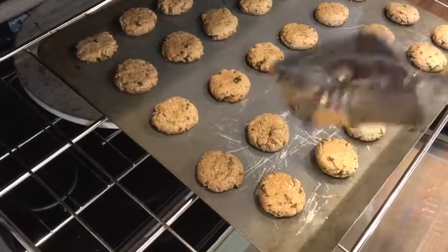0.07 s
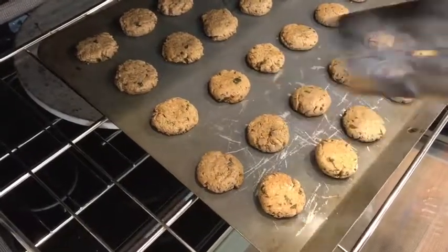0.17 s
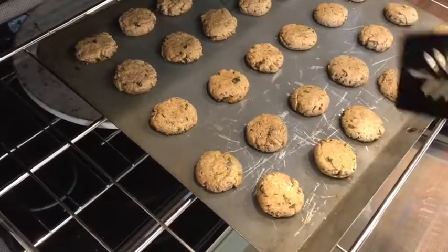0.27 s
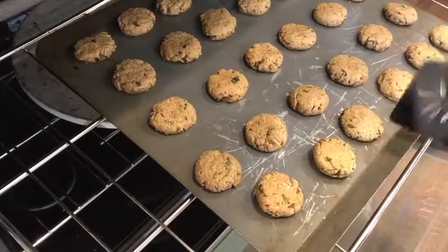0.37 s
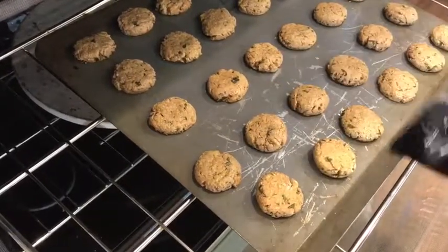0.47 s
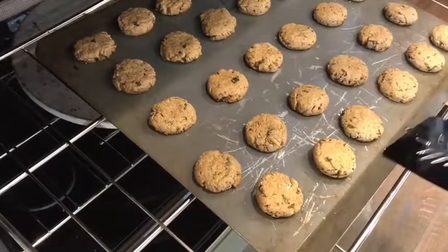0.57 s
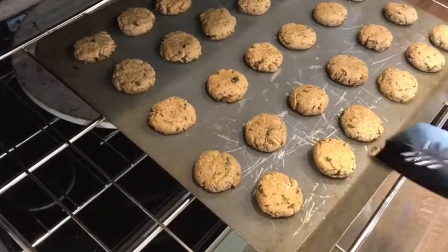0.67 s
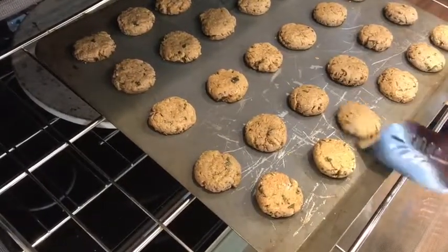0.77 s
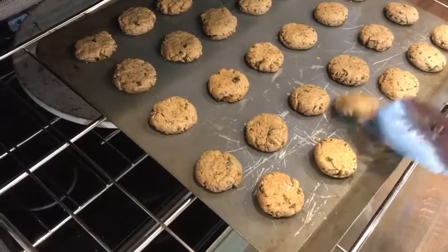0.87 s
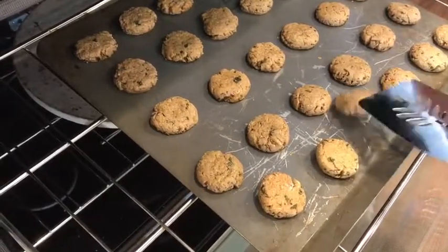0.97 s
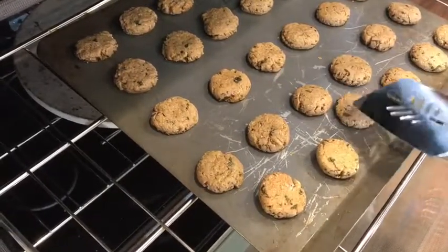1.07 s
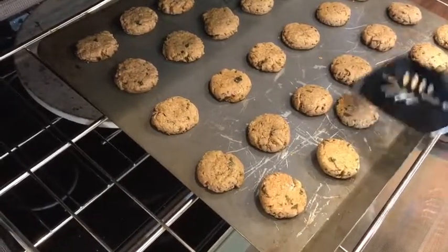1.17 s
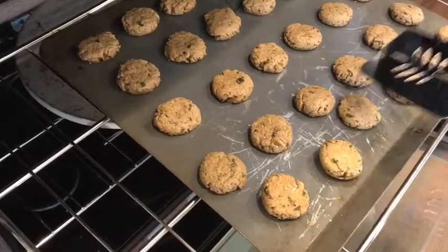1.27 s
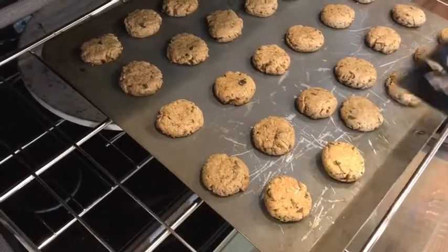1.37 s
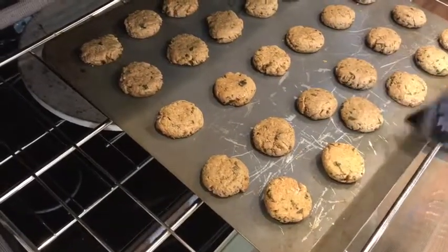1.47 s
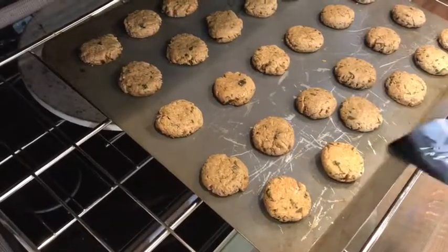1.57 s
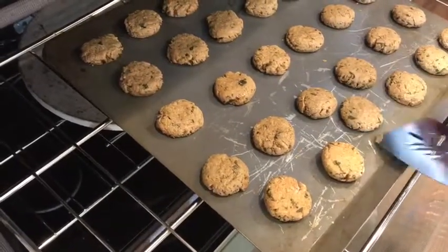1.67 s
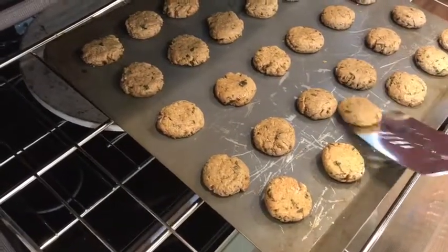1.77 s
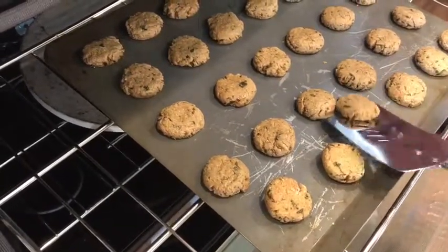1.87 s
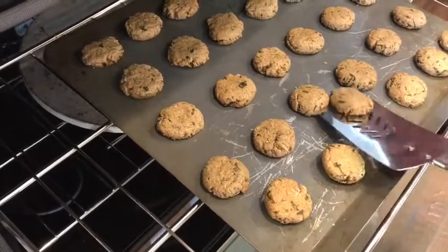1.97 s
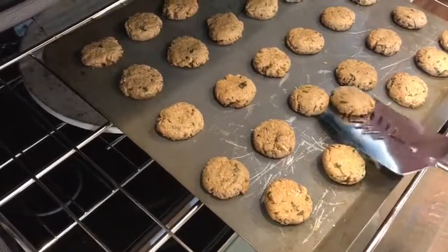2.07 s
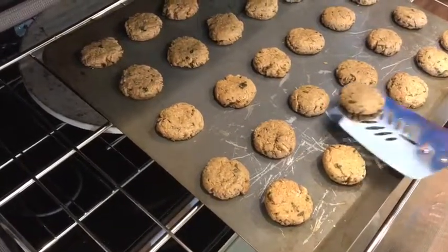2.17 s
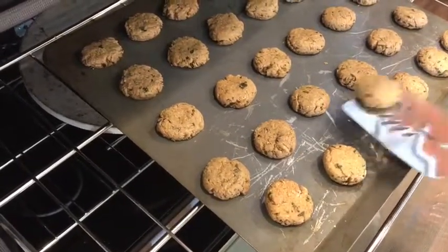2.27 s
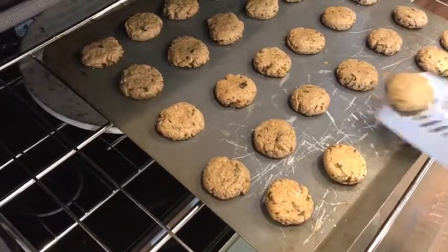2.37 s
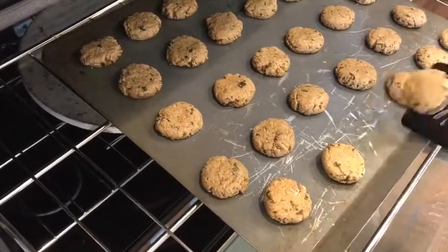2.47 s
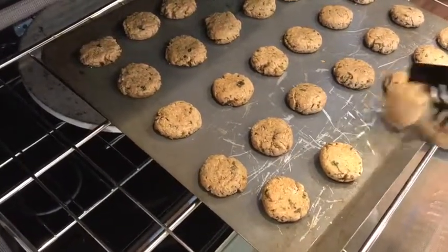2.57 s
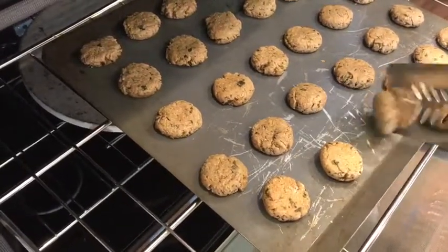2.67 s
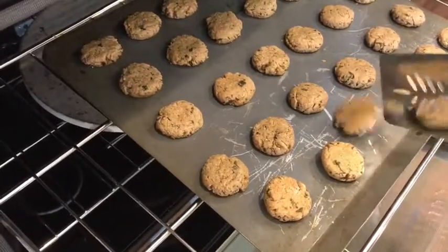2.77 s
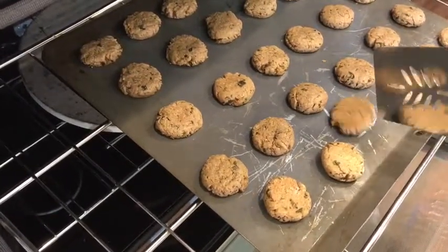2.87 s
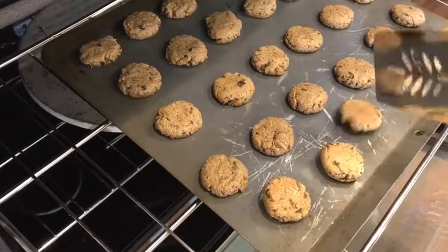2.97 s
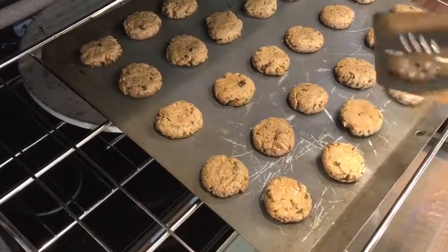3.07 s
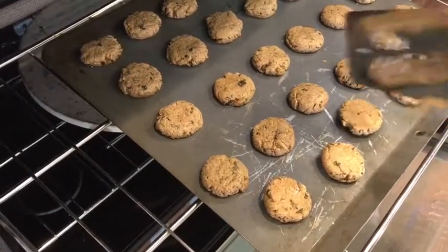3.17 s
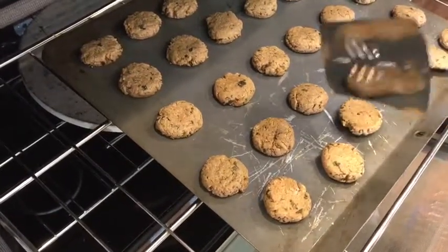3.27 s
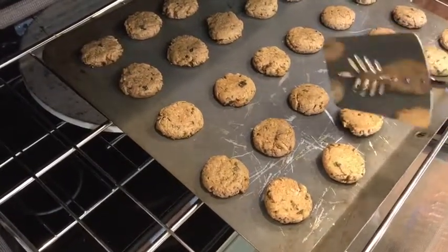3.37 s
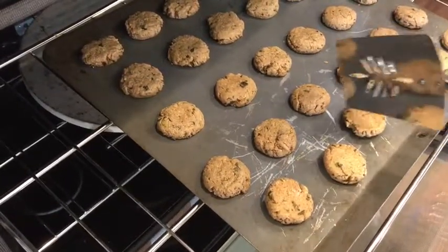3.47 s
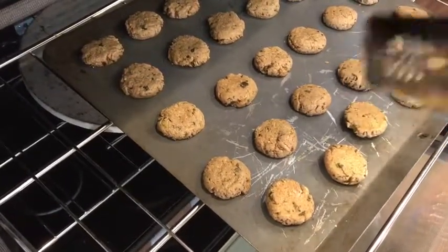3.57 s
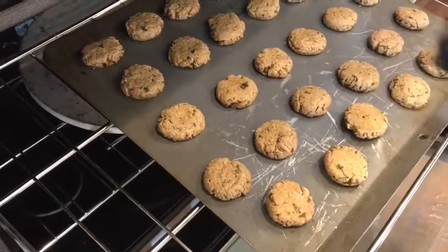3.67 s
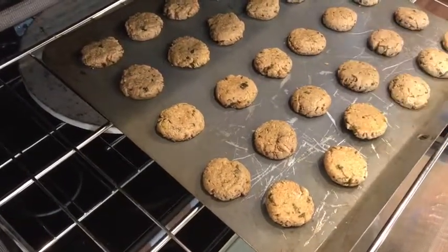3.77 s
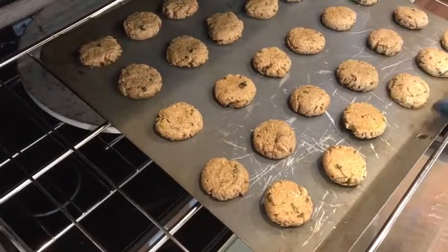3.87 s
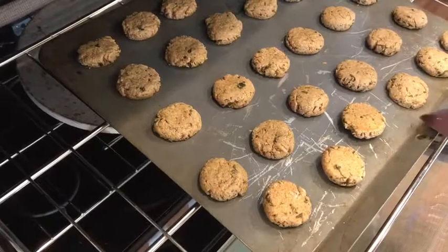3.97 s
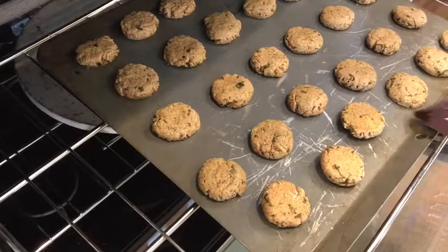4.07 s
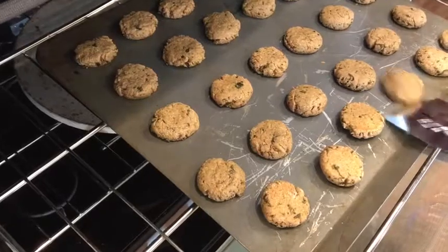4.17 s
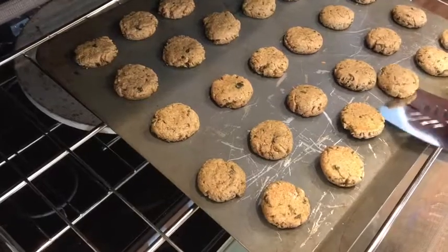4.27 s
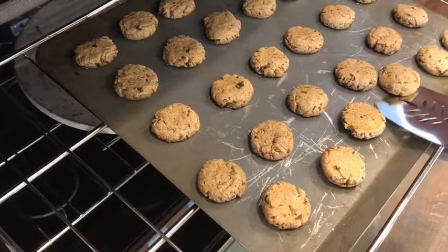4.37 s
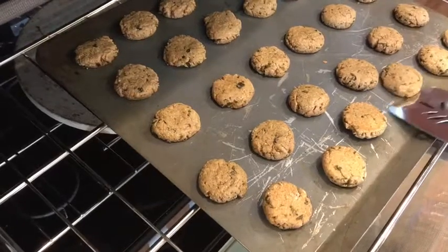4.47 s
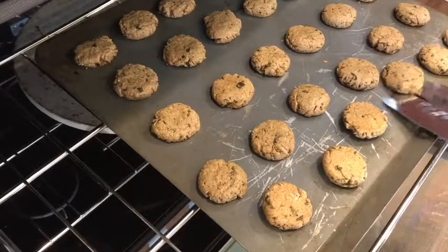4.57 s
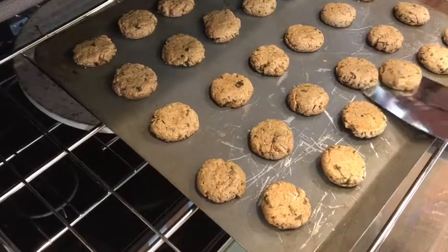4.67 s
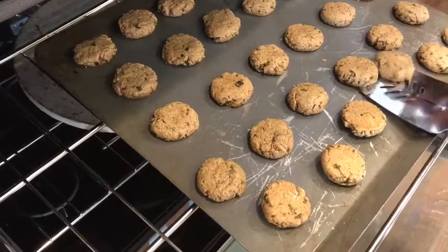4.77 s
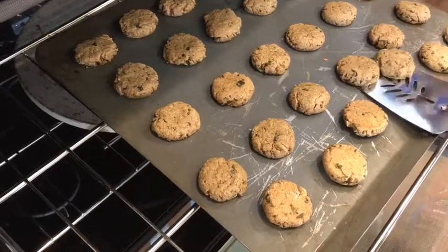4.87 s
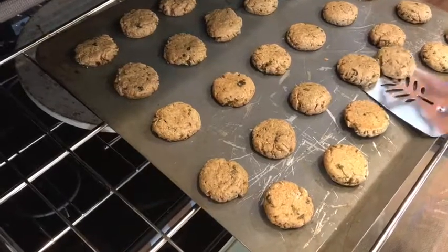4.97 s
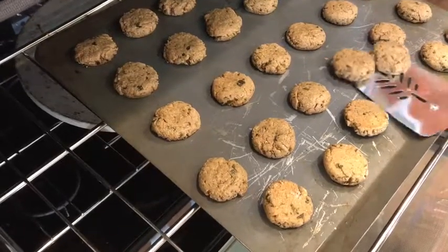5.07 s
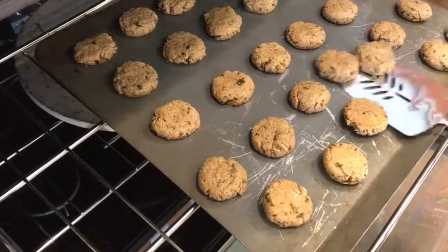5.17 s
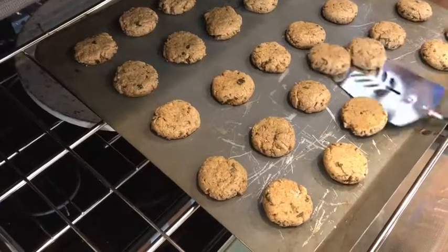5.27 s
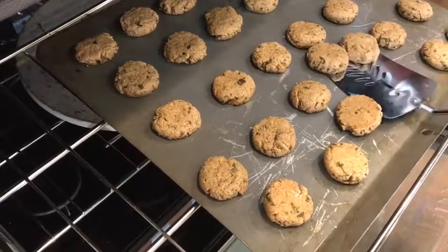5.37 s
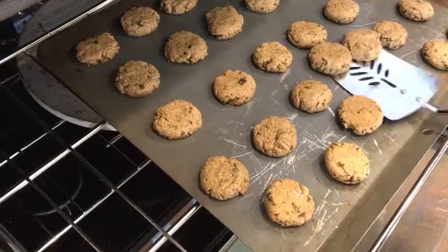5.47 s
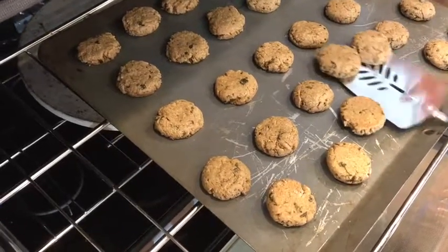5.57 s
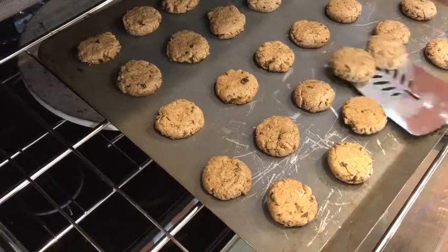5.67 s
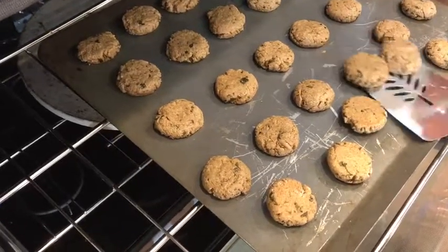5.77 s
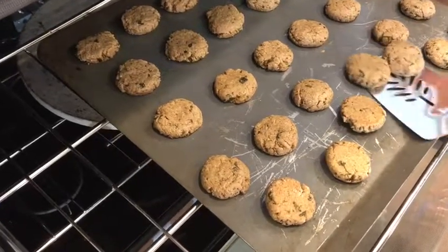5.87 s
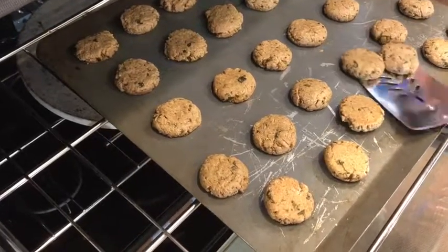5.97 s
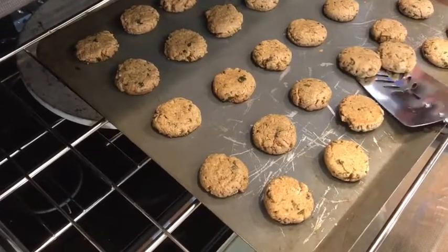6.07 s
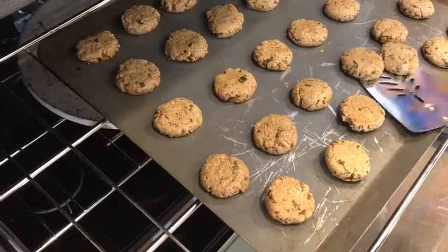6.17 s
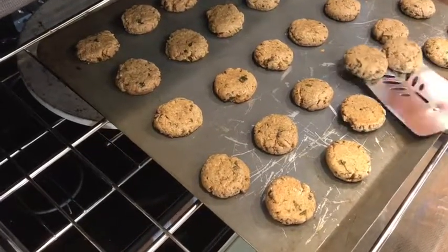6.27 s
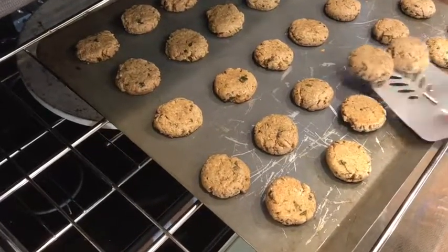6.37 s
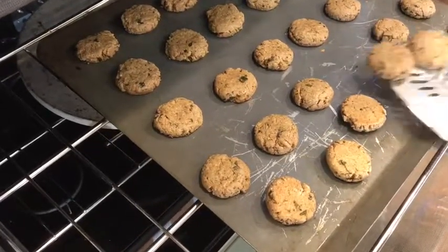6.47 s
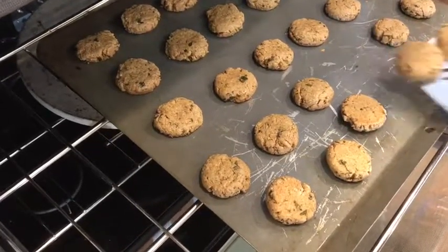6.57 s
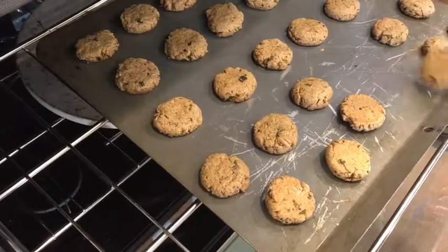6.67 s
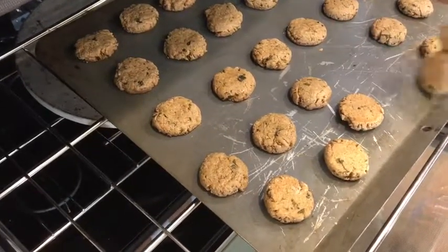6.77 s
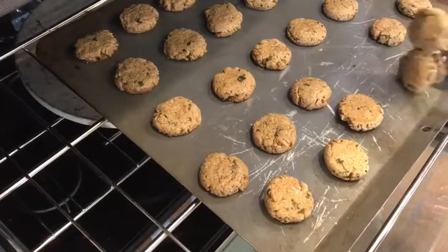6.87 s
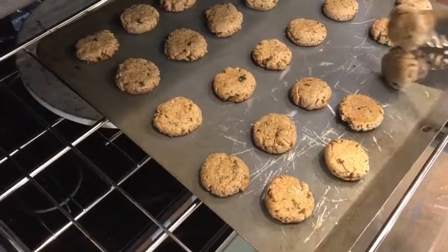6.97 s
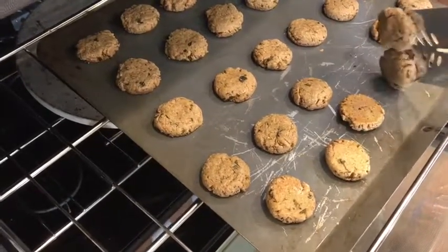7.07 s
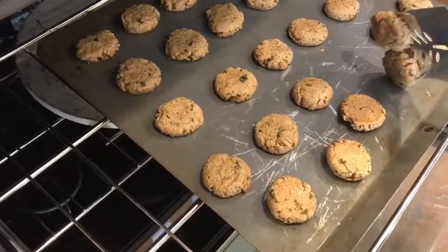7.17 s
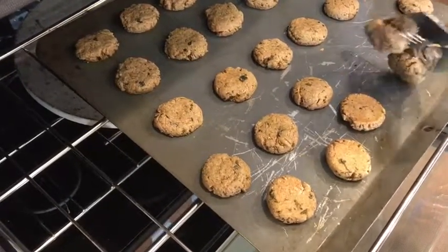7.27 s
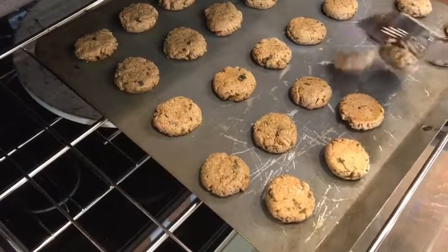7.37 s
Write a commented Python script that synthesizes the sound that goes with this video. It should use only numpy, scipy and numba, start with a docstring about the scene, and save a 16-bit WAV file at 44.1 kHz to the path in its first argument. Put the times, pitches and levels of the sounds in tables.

```python
"""In a quiet kitchen a steel spatula taps and scrapes a baking sheet that lies on an oven rack.
Blows excite decaying sheet modes, a dense modal crowd and the rack's boom; landings give dull damped thuds.
Scrapes are uneven clicks that sound directly and drive the sheet; a small metal trinket jingles near the hand,
the lifted blade pings and crumbs and cloth rustle. The metal gets a decaying room echo; filtered noise and
narrow drones form the kitchen hum, and one phone microphone limits the band."""
import sys
import numpy as np
from numba import njit
from scipy import signal
from scipy.fft import rfft, irfft, next_fast_len
from scipy.io import wavfile
from scipy.ndimage import uniform_filter1d

SR = 44100
rng = np.random.default_rng(int(sys.argv[2]) if len(sys.argv) > 2 else 0)


def dump(signal):
    """Clip the signal to [-1, 1] and save it as 16-bit WAV at the path in sys.argv[1]."""
    limited = np.clip(np.atleast_2d(signal).T, -1, 1)
    pcm = np.round(limited * 32767).astype(np.int16)
    wavfile.write(sys.argv[1], SR, pcm)


N = 326340  # samples

# clear modes of the sheet, before each exciter's scaling and limits: (frequency [Hz], level [dB], t60 [s])
SHEET_MODES = [(640.0, -5, 1.02), (975, -16.0, 0.0853), (1108, -7.0, 0.23), (1266, -6, 0.49),
               (1359, -6.5, 0.43), (1591, -10.5, 0.5), (1850, -27.5, 1.2), (1639, -59.5, 0.8),
               (1964, -16, 5.0), (2190, -8, 0.26), (2460, -5.5, 0.16), (3010, -11.0, 0.38),
               (3250, -15.0, 0.2), (3507, -7.5, 0.079), (3748, 1, 0.054), (4342, 9.5, 0.02),
               (4490, -12.5, 0.11), (4460, -56.5, 0.15), (5440, -38.5, 0.23), (5414, -20.5, 0.17),
               (6144, -28.5, 0.16), (6320, -7, 0.19), (7140, -19.5, 0.49), (7170, -13.0, 0.14),
               (342, -24.5, 0.61), (435.0, -14.0, .3), (1478, -8, 0.14), (2804, -13.5, 0.32),
               (3150, -11.5, .15)]
# corner frequencies of the broad colour regions: (natural logarithm of frequency in Hz)
COLOUR_LOG_HZ = np.log([300, 1150, 3200, 9500])
BANDS_HZ = 44 * 2 ** (np.arange(18) / 2)  # half-octave band centres
STEP = 512  # samples between values of a wandering mode coupling


def blows():
    """Impact excitation: a crack, clear modes, a dense crowd decaying band by band, and the rack's boom."""
    # blows on the sheet: (time [s], level [dB], softness index [-], favoured frequency [Hz],
    # clear modes re level [dB], ring length factor [-], rack boom [dB])
    blow_table = [(0.568, -16, -1.5, 2750, -7.5, 0.99, -65), (0.7286, -35.5, 4, 1340, -5, 1.96, -58),
                  (0.811, -21.5, -1, 4330, -13, 0.78, -57), (1.0915, -32.5, 9.5, 2800, -11, 0.66, -39),
                  (1.6433, -26, 4.5, 3330, -9.5, 1.5, -70), (1.6856, -41, 10, 1320, -2.5, 0.86, -68),
                  (1.8055, -34.5, 1, 3600, -18.5, 1.2, -53), (1.9, -48.5, 9, 2950, -3.5, 0.8, -65),
                  (1.9893, -43.5, 6.5, 1350, -6, 0.72, -56), (2.591, -16, 4.5, 3940, -12.5, 0.71, -35),
                  (2.6546, -29, 15, 990, -7.5, 0.78, -73), (2.7094, -55, 35.5, 650, -7.5, 1.16, -53),
                  (2.8285, -49, 18.5, 1370, -30, 0.59, -60), (2.9702, -59.5, 20, 1350, -19, 0.48, -74),
                  (3.0654, -61, 0, 920, -18.5, .45, -84), (4.0135, -15.5, -1.5, 1070, -8, 1.05, -55),
                  (4.2199, -45, 30, 1110, -13, 1, -45.5), (4.3543, -42.5, 6, 1500, -14.5, 1.75, -57),
                  (4.7124, -37.5, 4.5, 3150, -28, 1.7, -56), (5.0468, -19, 2, 3480, -15.5, 0.72, -47),
                  (5.232, -30, 10, 1640, -12, 0.86, -46.5), (5.6962, -21, 3.5, 2900, -9, 0.97, -39.5),
                  (5.8337, -31, 6.5, 3240, -11.5, 1, -51), (5.9464, -39, 21, 1110, -22, 0.71, -65),
                  (6.0213, -23, 3.5, 3450, -10.5, 0.69, -38), (6.237, -40, -1, 3820, 2, 0.24, -43.5),
                  (6.2594, -38, 1, 2980, -7, .86, -73)]
    # sheet modes too dense to tell apart: (frequency [Hz], level per hertz [dB], t60 before ring factor [s])
    crowd_modes = [(117.5, -3.5, 0.35), (307, 6, 0.26), (705, -5, 0.22), (1190, 3, 0.35),
                   (1688, -15.5, 0.38), (3450, -1.5, 0.1646), (4020, -8.5, 0.19), (5750, -12, 0.19),
                   (9000, -12.5, 0.121), (13000, -15, 0.25), (15500, -6, 0.084)]
    # rack modes: (frequency [Hz], level re boom [dB], t60 before the default shortening of a strike [s])
    rack_modes = [(81.16, -6, 1), (160.8, -12.5, 0.54), (233, -9.5, 0.19)]
    # colour of a blow at softness zero, bass to treble: (level [dB])
    edge_db = np.array([-10, -6, -0.5, -6.5])
    # change of that colour, bass to treble: (level per unit of softness [dB])
    per_soft_db = np.array([0.81, 0.7, 0.19, -0.53])

    out, power = np.zeros(N), np.zeros((len(BANDS_HZ), N))
    sheet, rack = np.array(SHEET_MODES, float), np.array(rack_modes, float)
    sheet[:, 2] = np.minimum(sheet[:, 2], 0.44 * on_log(crowd_modes, sheet[:, 0], axis=2))
    log_sheet_hz = np.log(sheet[:, 0])
    chance = rng.standard_normal((len(blow_table), 2, 3, len(sheet)))
    t = np.arange(SR // 4, dtype=np.float32) / SR
    hz = BANDS_HZ[:, None]
    t60 = on_log(crowd_modes, BANDS_HZ, axis=2)[:, None]
    # bending waves are slower in the bass, so low bands build up late
    arrival = 1 - np.exp(-t * hz / 4.1)
    for blow, (sheet_chance, rack_chance) in zip(blow_table, chance):
        s, db, softness, spot_hz, clear_db, stretch, boom_db = blow
        colour_db = edge_db + softness * per_soft_db

        # the place that is hit favours the modes near one pitch
        spot_db = 13.0 * np.exp(-((log_sheet_hz - np.log(spot_hz)) / 0.09) ** 2)
        tilt_db = np.interp(log_sheet_hz, COLOUR_LOG_HZ, colour_db)
        mode_db = db + clear_db + sheet[:, 1] + spot_db + tilt_db
        add(out, s, strike(sheet, mode_db, sheet_chance, stretch, scatter_db=3.0))

        rack_db = boom_db + rack[:, 1]
        add(out, s, strike(rack, rack_db, rack_chance[:, :len(rack)], rise_s=0.06, scatter_db=2.0))

        # the first touch of steel on steel: a very short tone at or above the favoured pitch
        contact = [(max(spot_hz, 2600), 0, 0.02)]
        add(out, s, strike(contact, db - 6.0, sheet_chance[:, :1], 0.45, scatter_db=2.0, rise_s=0.00024))

        # a slow modal decay under a fast initial burst
        fade = np.exp(-np.log(1000) * t / (t60 * stretch)) + undb(10.0) * np.exp(-t / 0.0025)
        band_db = db + on_log(crowd_modes, hz) + np.interp(np.log(hz), COLOUR_LOG_HZ, colour_db)
        add(power, s, (undb(band_db) * arrival * fade) ** 2)
    carrier = crowded(rng.standard_normal(N), share=0.41, t60=0.13)
    return out + sum(np.sqrt(p) * band for p, band in zip(power, half_octaves(carrier)))


def thuds():
    """Damped resonance: a soft, heavy contact excites one low, quickly fading mode."""
    # a cookie or the flat of the blade lands on the sheet: (time [s], level [dB], frequency [Hz])
    thud_table = [(1.095, -34.5, 188), (2.604, -41, 132), (4.223, -45.5, 174), (5.835, -48, 190),
                  (5.949, -38.5, 194), (6.022, -44.5, 176)]
    t60_s = 0.04875
    out = np.zeros(N)
    for (s, db, hz), chance in zip(thud_table, rng.standard_normal((len(thud_table), 3, 1))):
        add(out, s, strike([(hz, 0, t60_s)], db, chance, stretch=1, scatter_db=2, rise_s=0.00077))
    return out


def slides():
    """Friction excitation: grit under the edge clicks unevenly, sounds directly and drives the sheet's modes."""
    # strokes of the blade: (low-mid re level [dB], treble re level [dB], clear modes re level [dB],
    # curve of (time [s], level [dB]))
    stroke_table = [(-12, 0.5, -32, [(0.724, -67), (0.736, -36), (0.78, -40), (0.81, -41.5), (0.95, -59)]),
                    (3.5, 5, -28, [(1.68, -37.5), (1.714, -60), (1.748, -54), (1.78, -44.5), (1.81, -47),
                    (1.83, -54.5), (1.964, -55.5), (1.988, -49.5), (2.1, -84)]),
                    (1, 2.5, -29, [(4.04, -41.5), (4.15, -42), (4.176, -49.5), (4.195, -37), (4.258, -47.5),
                    (4.396, -53), (4.444, -78)]), (-0.5, 6, -32.5, [(4.444, -58), (4.534, -43),
                    (4.592, -60.5)]), (2.5, 2, -37.5, [(4.592, -53.5), (4.64, -42.5), (4.68, -41),
                    (4.7, -41.5), (4.74, -42.5), (4.786, -43.5), (4.912, -78.5)]),
                    (-2.5, -5.5, -35, [(5.09, -59), (5.125, -43), (5.2, -33), (5.23, -41), (5.24, -38),
                    (5.252, -27.5), (5.27, -46), (5.336, -54.5), (5.5, -57)]), (3, -19, -35, [(6.22, -65),
                    (6.25, -49), (6.262, -34), (6.306, -53), (6.4, -92)])]
    # spectrum of the sliding grit: (frequency [Hz], level per hertz [dB])
    rasp_spectrum = [(88, -44), (150, -19.5), (460, -16.5), (709, -17.5), (783, -12), (934, -8),
                     (1820, -10), (2980, -4.5), (5700, -15.5), (15300, -24), (16500, -12.5)]

    grit = gritty(1500, 0.86, 0.88) * flicker(70, 1.86)
    grit = crowded(grit, share=0.073, t60=0.23)
    # gain rows: low-mid, middle, treble, clear modes
    gains = sum(undb([[low_db], [0], [top_db], [clear_db]]) * follow(curve)
                for low_db, top_db, clear_db, curve in stroke_table)
    # each band blends the three colour regions
    shares = np.transpose([np.interp(np.log(BANDS_HZ), COLOUR_LOG_HZ[1:], row) for row in np.eye(3)])
    force = sum(undb(on_log(rasp_spectrum, hz)) * band * (share @ gains[:3])
                for hz, band, share in zip(BANDS_HZ, half_octaves(grit), shares))
    hz, db, t60 = np.array(SHEET_MODES, float).T
    # the pressing blade keeps the ringing short and evens out the mode levels
    sheet_force = force * gains[3] / gains[1]
    modes = ring(sheet_force, hz, 0.6 * db, np.minimum(t60, 0.075), wander_db=5.0, rate=24.0)
    return undb(6.0) * force + modes


def rustles():
    """Filtered impulsive noise: faint crackle of crumbs and cloth, a patch near 4 kHz and a broad treble."""
    # rustles: (time [s], length [s], level [dB], treble re level [dB])
    rustle_table = [(0.115, 0.057, -65, 3.5), (0.18, 0.12, -67, 7), (0.276, 0.11, -62, -2),
                    (0.45, 0.13, -69, 8.5), (0.96, 0.064, -68, 2), (1.103, 0.12, -63, 4.5),
                    (1.253, 0.078, -62, -2.5), (1.335, .04, -76, 8), (1.475, .05, -76, 6),
                    (2.19, 0.13, -68.5, -8), (2.39, 0.072, -72, 5), (2.96, .08, -79, 3),
                    (3.188, 0.087, -65, -13), (3.46, .09, -73.5, 4), (6.842, 0.1, -65, 0.5),
                    (7.004, 0.072, -67, -0.5), (7.18, .09, -69, -7)]
    grit = gritty(1500, 1.2, 1.5) * flicker(30, 2.5)
    patch = signal.sosfilt(signal.butter(2, [3000, 5200], "bandpass", fs=SR, output="sos"), grit)
    top = signal.sosfilt(signal.butter(2, 5500, "highpass", fs=SR, output="sos"), grit)
    gains = np.zeros((2, N))
    for s, length_s, db, top_db in rustle_table:
        add(gains, s, undb([[db], [db + top_db]]) * swell(length_s))
    return unit(patch) * gains[0] + unit(top) * gains[1]


def jingles():
    """Repeated impact: a fading train of rattle impulses drives the tiny trinket's high modes."""
    # jingles of the trinket: (time [s], level [dB], lowest mode re level [dB])
    jingle_table = [(0.158, -56, -17), (0.202, -46, -10), (0.2129, -38.5, -6.5), (0.4753, -49, -10),
                    (0.5053, -45, -26.5), (0.6634, -59.5, -11.5), (0.6754, -35, -30), (0.6838, -26, -14)]
    # trinket modes: (frequency [Hz], level [dB], t60 [s])
    trinket_modes = [(3866, -7, 0.049), (8900, -36, 0.14), (10010, -11, 0.085), (9600, -28, 0.11),
                     (12027, -6, 0.091), (12100, -20, 0.27), (14910, -20, 0.08), (15100, -10.5, .14)]
    high, low = np.zeros(N), np.zeros(N)
    t = np.arange(SR // 5) / SR
    for (s, db, low_db), chance in zip(jingle_table, rng.standard_normal((len(jingle_table), 2, len(t)))):
        # sparse random impulses follow a firm first one
        force = chance[0] * (chance[1] > 1.6) * np.exp(-t / 0.014)
        force[0] = 3.2
        force = force / np.sqrt(np.sum(force ** 2))
        add(high, s, undb(db) * force)
        add(low, s, undb(db + low_db) * force)
    hz, db, t60 = np.array(trinket_modes).T
    lowest = ring(low, hz[:1], db[:1], t60[:1], wander_db=11.0, rate=60.0)
    upper = ring(high, hz[1:], db[1:], t60[1:], wander_db=5.5, rate=40.0)
    return lowest + upper


def pings():
    """Free vibration: the lifted blade rings thinly in two lightly damped modes."""
    # pings of the blade: (time [s], level [dB], upper mode re level [dB])
    ping_table = [(0.225, -59, -2), (0.511, -64, -14), (0.69, -56, 5), (3.535, -68, -21)]
    # blade modes: (frequency [Hz], level, not used [dB], t60 before the default shortening of a strike [s])
    blade_modes = [(4870, 0, .5), (5480, -4, .25)]
    out = np.zeros(N)
    for (s, db, upper_db), chance in zip(ping_table, rng.standard_normal((len(ping_table), 3, len(blade_modes)))):
        mode_db = db + np.array([0, upper_db])
        add(out, s, strike(blade_modes, mode_db, chance, scatter_db=0.5, detune=0.0008, rise_s=0.0032))
    return out


def kitchen():
    """Stationary noise: shaped air and appliance noise swells a little; noise-driven resonances drone."""
    # spectrum of the air noise, before its overall level is set: (frequency [Hz], level per hertz [dB])
    air_spectrum = [(15, -32), (25, 3), (124, -11), (208, -13), (238, -12.5), (266, -11.5), (483, -17),
                    (538, -22.5), (726, -22), (1680, -23.5), (1980, -23.5), (7510, -32.5), (12600, -32),
                    (15200, -28), (16500, -37)]
    # appliance drones: (frequency [Hz], bandwidth [Hz], level [dB])
    hum_table = [(55.1, 9.4, -68), (242.4, 5.2, -74.5), (494, 3.4, -92), (780, 4.4, -98)]
    air_db = -64.0
    slow_swell = flicker(2.5, 0.8)
    air = sum(undb(on_log(air_spectrum, hz)) * flicker(8, 1.2) * band
              for hz, band in zip(BANDS_HZ, half_octaves(rng.standard_normal(N))))
    hz, width, db = np.array(hum_table, float).T
    # compensates for the bandwidth, so that the level is the rms of a noise-driven mode
    drive_db = db + 10 * np.log10(4 * np.pi * width / SR)
    drone = ring(rng.standard_normal(N), hz, drive_db, np.log(1000) / (np.pi * width))
    return undb(air_db) * unit(air) * slow_swell + drone


def strike(modes, db, chance, stretch=0.75, scatter_db=2.5, detune=0.0033, rise_s=0.0025):
    """Modal impulse response: each blow finds its own gains, signs and slightly shifted pitches."""
    hz, _, t60 = np.array(modes, float).T
    t60 = np.clip(t60, 0.02, 1.5) * stretch
    pole = mode_poles(hz * (1 + detune * chance[1]), t60)
    force = np.zeros(int(t60.max() * SR))
    force[0] = 1
    gain = undb(db + scatter_db * chance[0]) * np.sign(chance[2])
    tone = resonate(force, pole.real.copy(), pole.imag.copy(), gain[None], len(force))
    return tone * (1 - np.exp(-np.arange(len(force)) / (rise_s * SR)))


def ring(force, hz, db, t60, wander_db=0., rate=9.):
    """Forced modal vibration: a lasting force drives modes whose couplings wander at a rate in Hz."""
    pole = mode_poles(hz, np.clip(t60, 0.01, 2))
    hold, steps = max(int(SR / STEP / rate), 1), N // STEP + 1
    held = rng.standard_normal((steps, len(hz)))[np.arange(steps) // hold]
    wander = np.clip(1.42 * uniform_filter1d(held, hold, axis=0), -2, 1)
    return resonate(force, pole.real.copy(), pole.imag.copy(), undb(db + wander_db * wander), STEP)


def mode_poles(hz, t60):
    """Damped oscillation: the angle of a complex pole sets pitch, its radius a 60 dB decay in t60."""
    return np.exp(2j * np.pi * hz / SR - np.log(1000) / (t60 * SR))


@njit(fastmath=True)
def resonate(force, re, im, coupling, step):
    """Modal superposition: one force drives all modes; couplings change as the contact moves."""
    out, a, b = np.zeros(len(force)), np.zeros(len(re)), np.zeros(len(re))
    for i in range(len(force)):
        gain, total = coupling[i // step], 0.
        for m in range(len(re)):
            # rotate and shrink the state, then push its real part; the tiny constant avoids denormals
            real = a[m] * re[m] - b[m] * im[m] + gain[m] * force[i] + 1e-18
            imag = a[m] * im[m] + b[m] * re[m]
            a[m], b[m] = real, imag
            total += imag
        out[i] = total
    return out


def crowded(force, share, t60):
    """High modal density: many unnamed sheet modes, shorter in the treble, sound beside the force itself."""
    hz = 200 + 190 * (np.arange(80) + rng.uniform(-0.35, 0.35, size=80))
    t60 = t60 / (1 + hz / 5000)
    modes = ring(force, hz, -10 * np.log10(t60), t60, wander_db=11.0, rate=22.0)
    return np.sqrt(share) * unit(modes) + np.sqrt(1 - share) * unit(force)


def gritty(rate, scatter_db, hiss):
    """Shot noise: uneven random clicks, rate per second, over a share of hiss."""
    clicks = (rng.random(N) < rate / SR) * rng.standard_normal(N)
    clicks = clicks * undb(scatter_db * rng.exponential(size=N))
    return unit(unit(clicks) + hiss * rng.standard_normal(N))


def flicker(rate, spread_db):
    """Random amplitude modulation: levels drawn every 1 / rate seconds, with smooth slews between them."""
    hold, steps = max(int(SR / 64 / rate), 1), N // 64 + 1  # one control value per 64 samples
    held = rng.standard_normal(steps)[np.arange(steps) // hold]
    db = unit(uniform_filter1d(uniform_filter1d(held, hold), hold))
    return np.repeat(undb(spread_db * db), 64)[:N]


def follow(curve):
    """Amplitude envelope: gain along a level curve in dB, practically silent outside it."""
    s, db = np.transpose(curve)
    return uniform_filter1d(undb(np.interp(np.arange(N) / SR, s, db, -200, -200)), size=400)


def swell(length_s):
    """Amplitude envelope: a rounded rise and a somewhat shorter fall."""
    u, rise = np.linspace(0, 1, int(length_s * SR)), 0.58  # rise as a share of the length
    return np.sin(np.pi / 2 * np.minimum(u / rise, (1 - u) / (1 - rise)))


def half_octaves(x):
    """Spectral decomposition: overlapping half-octave bands on a logarithmic scale."""
    size = next_fast_len(len(x))
    spectrum = rfft(x, size)
    place = 2 * np.log2(np.maximum(np.fft.rfftfreq(size, 1 / SR), 1) / BANDS_HZ[0])
    for k in range(len(BANDS_HZ)):
        yield irfft(spectrum * np.maximum(1 - np.abs(place - k), 0), size)[:len(x)]


def on_log(table, hz, axis=1):
    """Logarithmic frequency scale: read a column of a frequency table between its points."""
    table = np.array(table, float)
    return np.interp(np.log(hz), np.log(table[:, 0]), table[:, axis])


def undb(db):
    """Decibel definition: level in dB to amplitude gain."""
    return 10 ** (np.asarray(db) / 20)


def unit(x):
    """Root-mean-square normalisation: scale to rms 1."""
    return x / np.sqrt(np.mean(x ** 2))


def add(out, s, x):
    """Linear superposition: mix x into out from time s in seconds."""
    i = int(s * SR)
    out[..., i:i + x.shape[-1]] += x[..., :out.shape[-1] - i]


def room(source):
    """Diffuse reverberation: convolution with decaying, darkened noise gives the echo from the walls."""
    t60_s, level_db = 0.29, -18.5
    t = np.arange(SR // 2) / SR
    echo = rng.standard_normal(len(t)) * np.exp(-np.log(1000) * t / t60_s) * (1 - np.exp(-t / 0.024))
    echo = signal.lfilter([1], [1, -0.4], echo)
    return undb(level_db) * signal.fftconvolve(source, echo / np.sqrt(np.sum(echo ** 2)))[:N]


def scene():
    """Superposition of the metal sounds and rustles, their echo, and the kitchen background."""
    near = blows() + thuds() + slides() + rustles() + jingles() + pings()
    return (near + room(near) + kitchen())[None]


def record(dry):
    """Band limitation: the phone drops the deepest bass and cuts the top."""
    thin = signal.sosfilt(signal.butter(2, 30, "highpass", fs=SR, output="sos"), dry)
    return signal.sosfilt(signal.ellip(8, 0.2, 70, 15750, fs=SR, output="sos"), thin)


dry = scene()
out = record(dry)
dump(out)
```